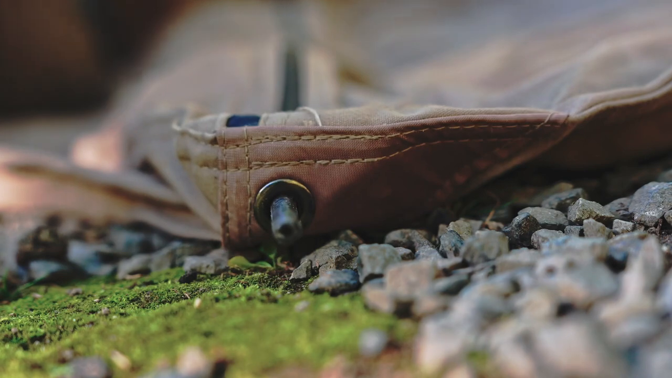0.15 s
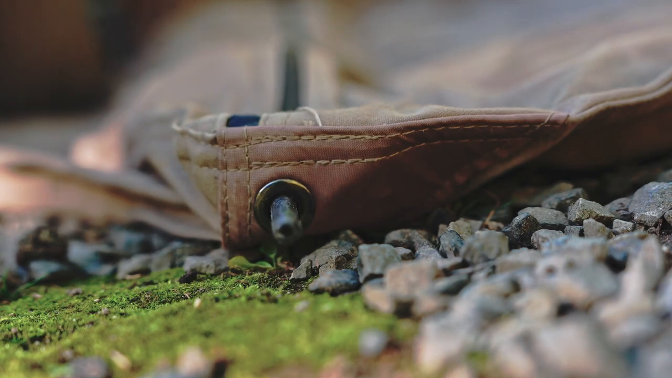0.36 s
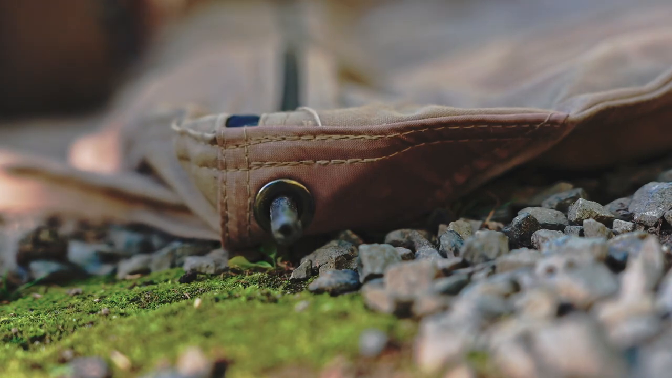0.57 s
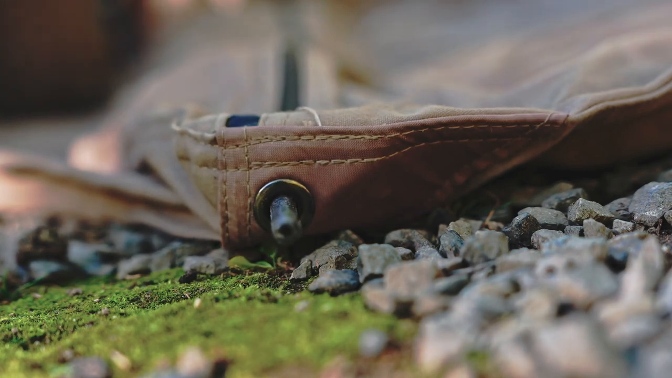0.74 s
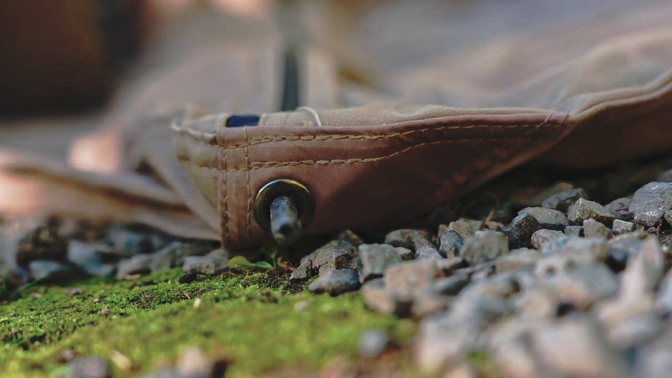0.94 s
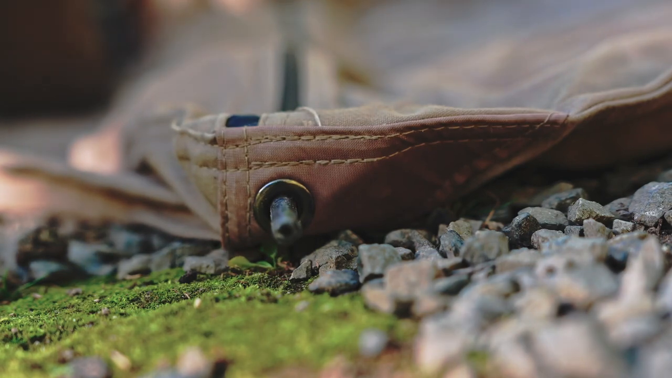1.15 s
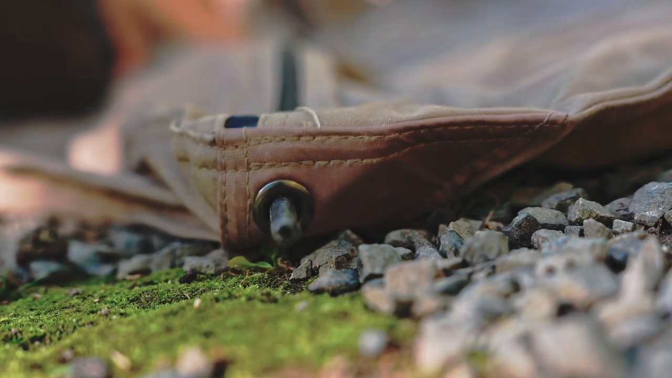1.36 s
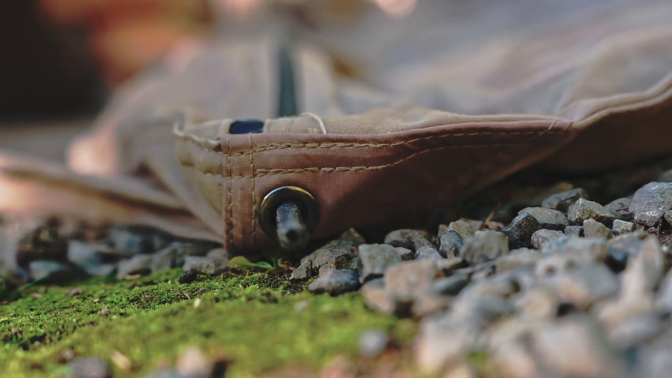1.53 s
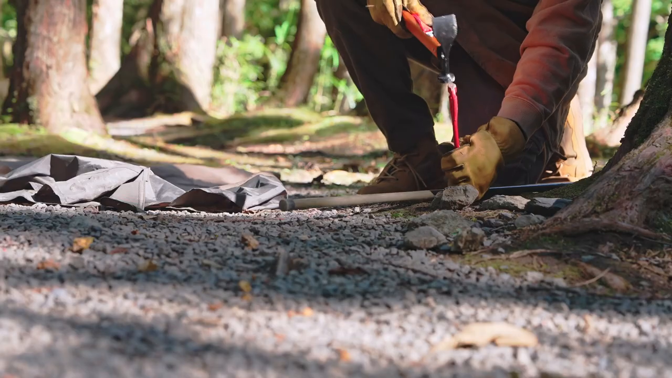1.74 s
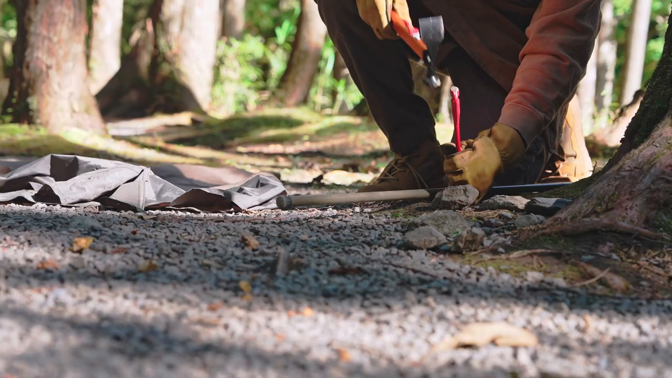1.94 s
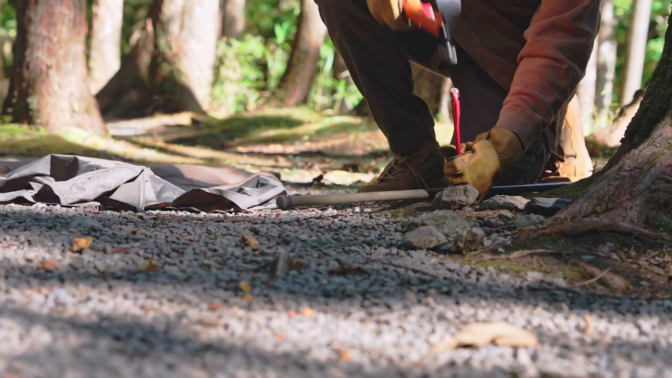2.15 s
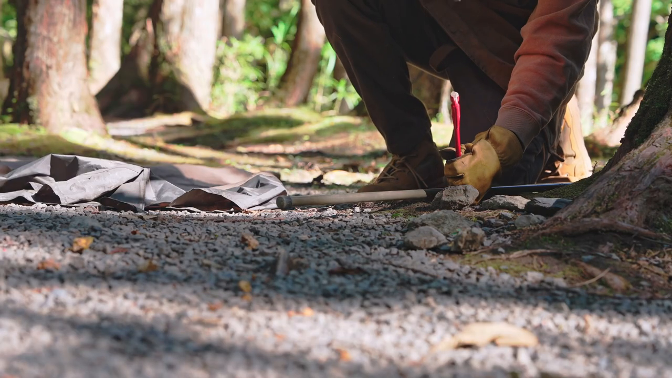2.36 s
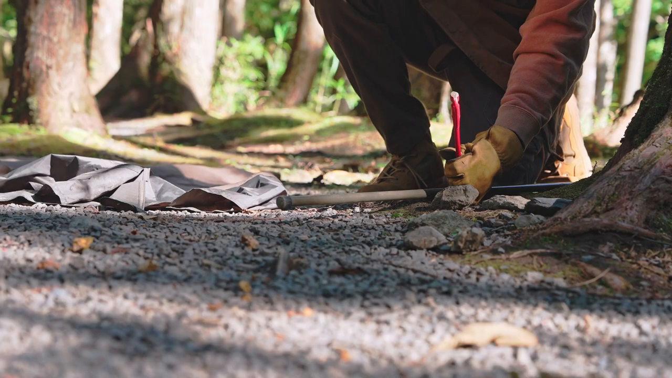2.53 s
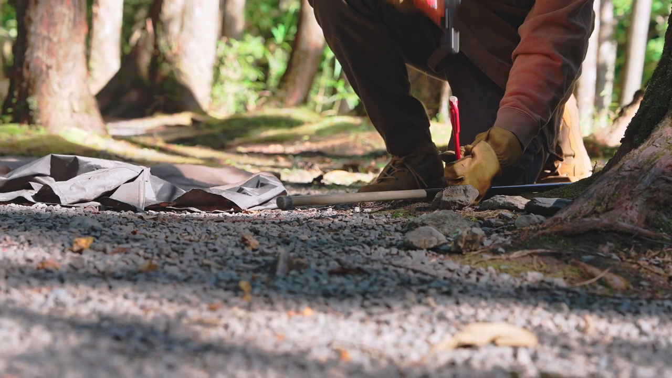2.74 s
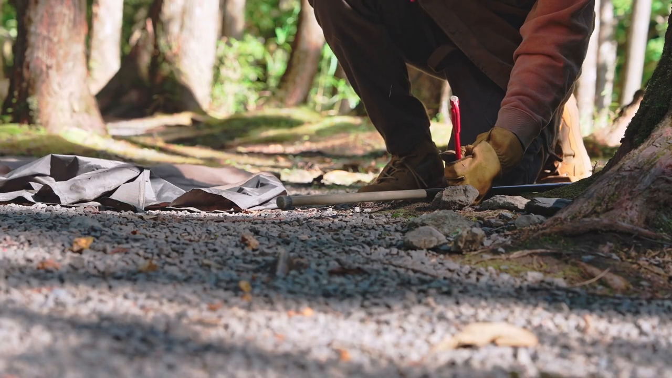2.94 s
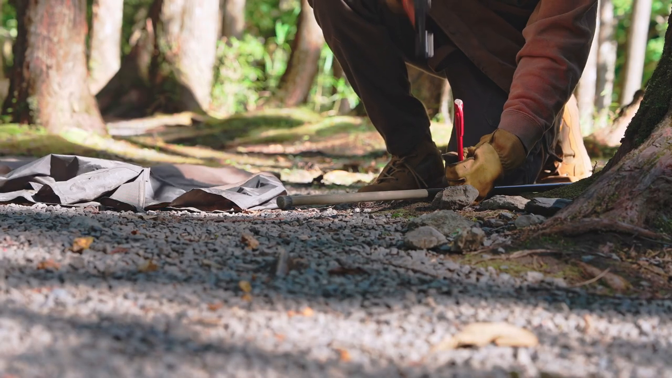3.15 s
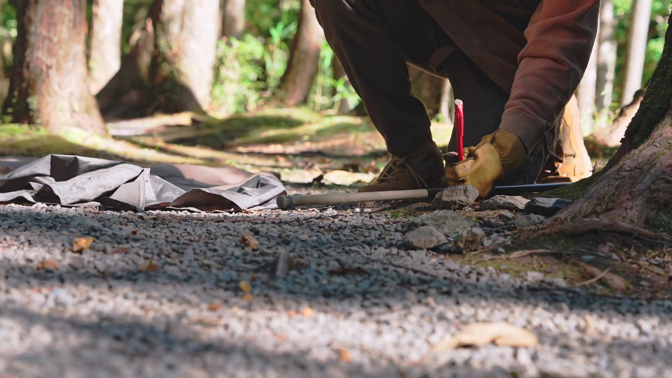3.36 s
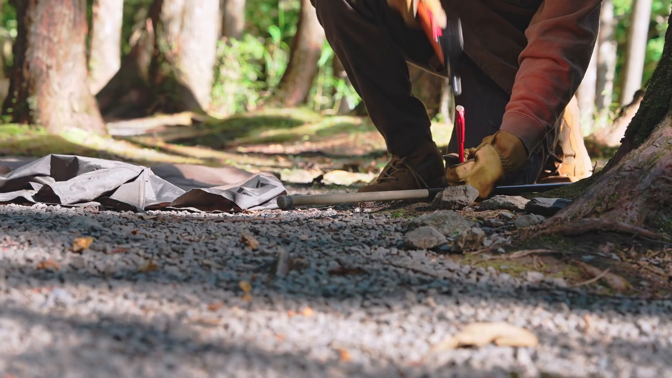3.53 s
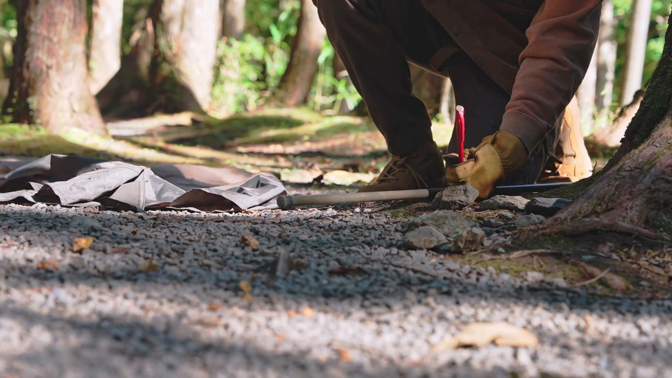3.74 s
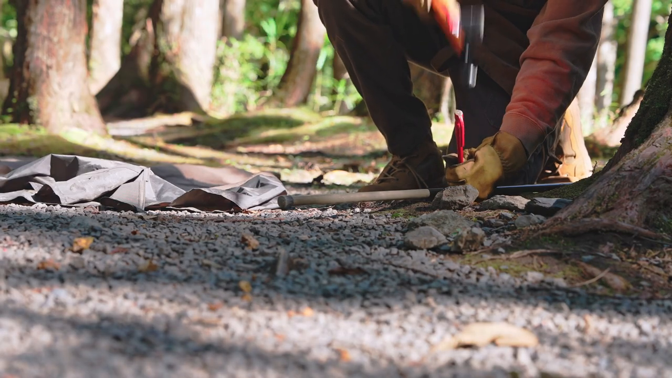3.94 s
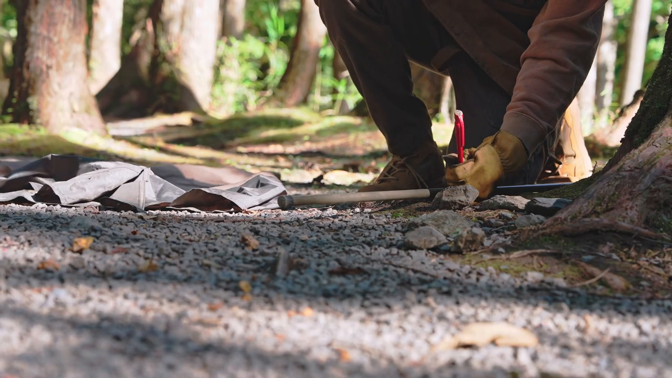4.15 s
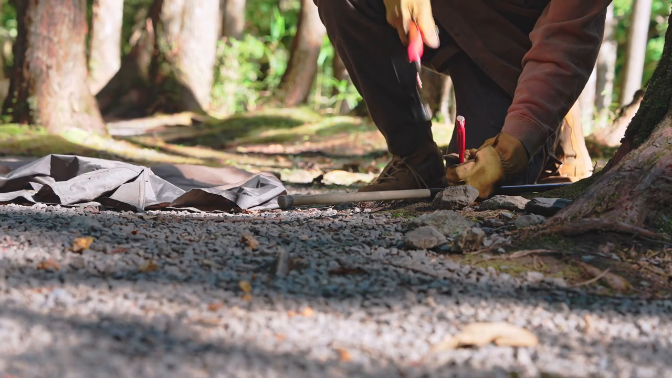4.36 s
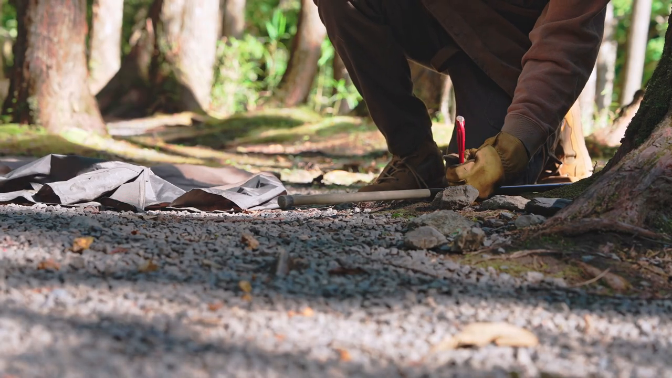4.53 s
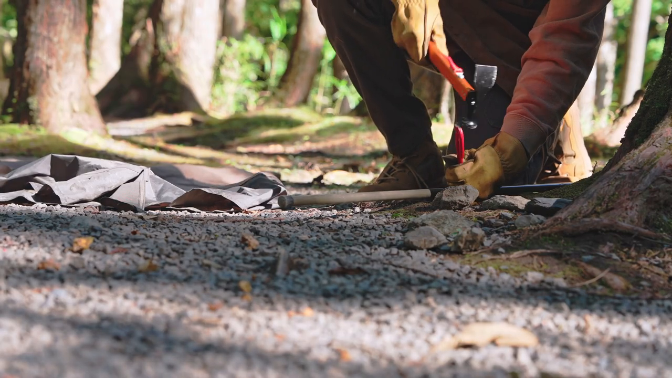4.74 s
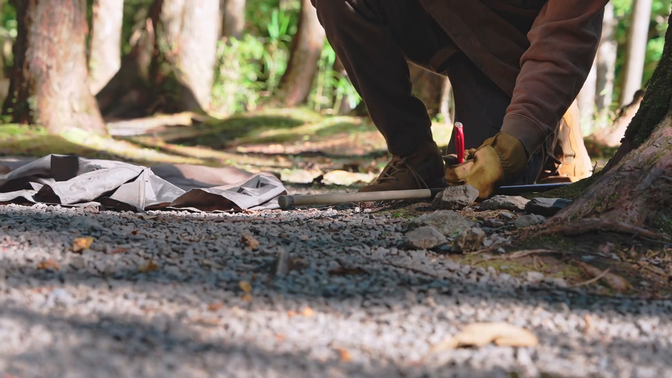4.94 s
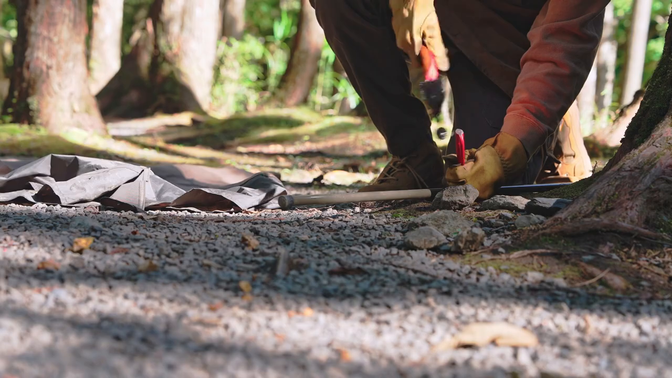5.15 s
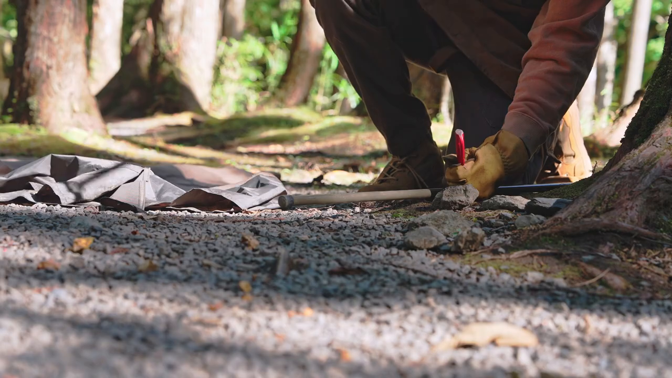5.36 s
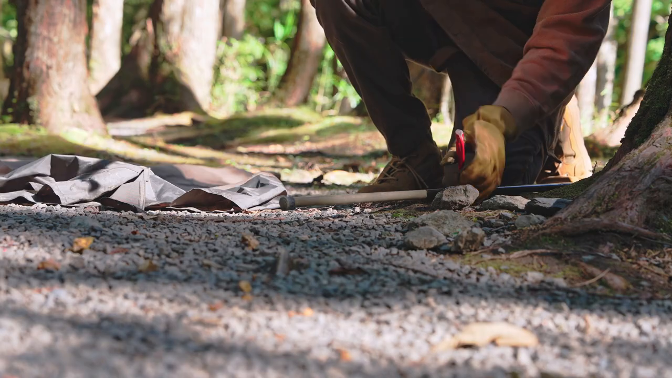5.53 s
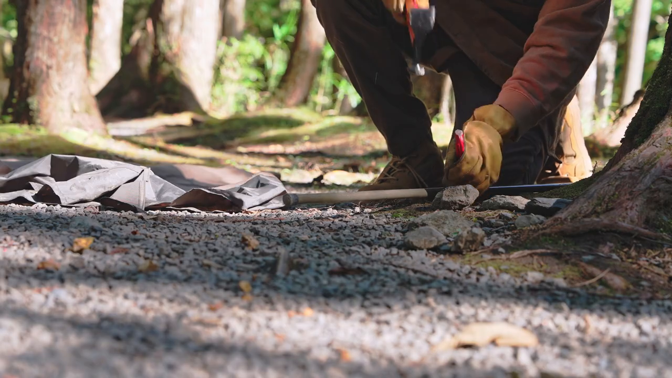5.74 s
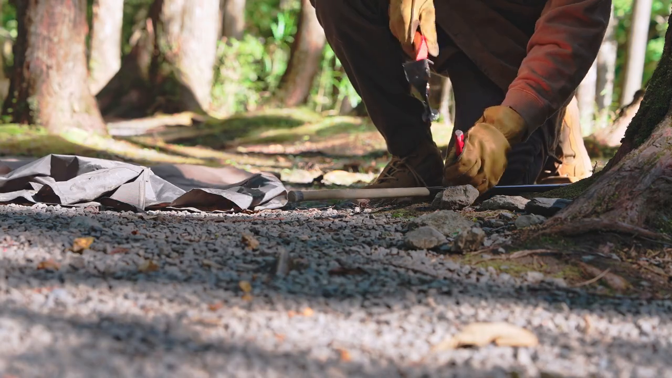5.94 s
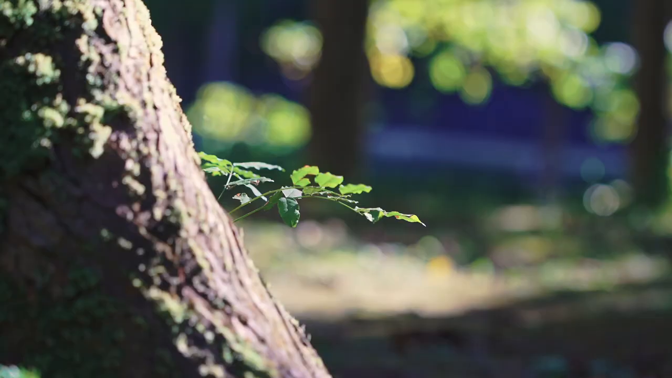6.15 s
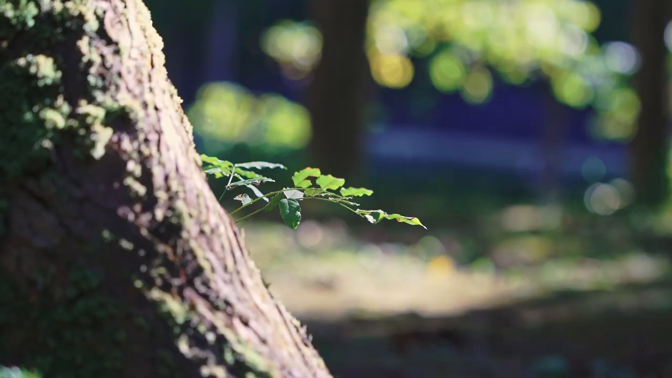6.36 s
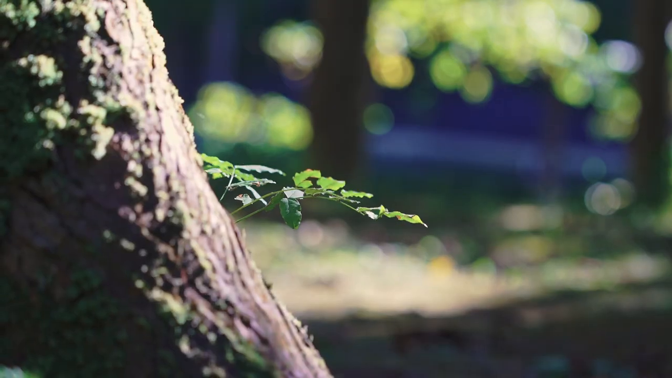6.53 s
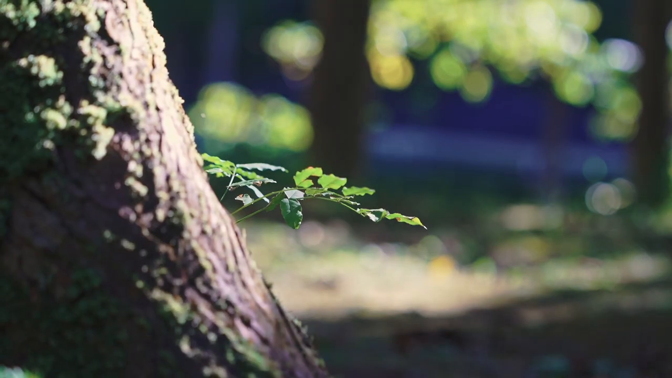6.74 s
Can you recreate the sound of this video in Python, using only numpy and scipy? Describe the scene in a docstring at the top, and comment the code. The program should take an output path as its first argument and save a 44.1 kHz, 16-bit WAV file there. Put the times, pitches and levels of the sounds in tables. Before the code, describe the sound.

A quiet forest with a soft, low wash of air. From 0 to 1.7 s, close fabric rustles faintly, with swishes around 0.6 to 0.8 s and 1.4 to 1.6 s, and tiny ticks scatter between them. At about 1.05 s a boot crunches briefly on gravel, with a low push and a very short falling squeak. A hammer then hits a metal stake at 1.7, 1.9 and 2.2 s, each blow stronger, then loud and regular roughly every 0.42 s from 2.6 to 5.2 s. Each is a bright, hard steel clink, choked almost at once, with a crack, little low thud and a soft scattered echo from tree trunks. Only air remains until 6.2 s, when it abruptly grows louder with a smooth hiss. Low breeze buffets the microphone, with a soft bump near 6.4 s. Two more blows ring at 6.5 and 6.9 s, the last cut off by the end.

```python
"""A steel hammer drives a metal tent stake into gravel in a forest.
First, over a steady wash of air: cloth rustles (filtered grains), small things tick (decaying partials), a boot
crunches (noise snaps, low noise, a gliding squeak). Then twelve blows: choked steel modes, crack, thud and ground
push, each with a soft echo from the trunks (sparse taps). At 6.2 s a cut: the air is abruptly louder, with a smooth
hiss. Around it a breeze bumps the microphone (low noise, one pulse). Gain control and a limiter act on loud blows."""
import sys
import numpy as np
from scipy import signal
from scipy.fft import rfft, irfft
from scipy.io import wavfile
from scipy.ndimage import uniform_filter1d

SR = 44100
rng = np.random.default_rng(int(sys.argv[2]) if len(sys.argv) > 2 else 0)


def dump_mix(stems):
    """Bounce the given channels to the path in sys.argv[1] as a 16-bit WAV at rate SR."""
    frames = np.atleast_2d(stems).T  # one column per channel
    limited = np.clip(frames, -1, 1)  # hard clip at full scale
    pcm = np.round(limited * 32767).astype(np.int16)
    wavfile.write(sys.argv[1], SR, pcm)


N = 303849

# Air spectrum. Each row: frequency in Hz, relative level in dB.
AIR_SPECTRUM = [(15, -35), (30, -20), (72, -6), (125, -3), (175, -7.5), (330, -8.5), (560, -12),
                (800, -15.5), (1400, -20), (4300, -24), (4800, -31.5), (8700, -35.5), (9400, -41.5),
                (12000, -41), (16000, -44.5)]
# Air level over time, with a step at the cut. Each row: time in seconds, level in dB against AIR_DB.
AIR_LEVEL = [(0, 0), (.6, 1.5), (1.2, 1), (2, 3.5), (3.5, 0.5), (5.5, -1.26), (6.18, -0.5), (6.22, 6.5),
             (6.89, 4.5)]
AIR_DB = -52.5

# Spectrum of the fine cloth grains. Each row: frequency in Hz, relative level in dB.
CLOTH_FINE_SPECTRUM = [(2500, -21), (4500, 1), (8000, 2.5), (10000, 0.5), (13000, 6.5), (16000, -0.5)]
# Duller cloth body, then hiss after the cut. Each row: frequency in Hz, relative level in dB.
CLOTH_BODY_SPECTRUM = [(500, -5.0), (1000, 0.5), (2000, 1.5), (3000, -3.0), (4500, -16)]
HISS_SPECTRUM = [(300, -2.0), (1200, 0.0), (4000, -2.5), (9000, -10.0), (16000, -19)]
# Faint cloth bed. Each row: time in seconds, level of the fine grains in dB.
CLOTH_BED = [(0, -58), (.25, -71.5), (.48, -60.5), (.68, -72), (1.02, -57), (1.35, -60.5), (1.69, -61)]
BED_BODY_DB = -11.5  # body of the bed against its fine grains
# Cloth swishes. Each row: time of the peak in seconds, fine grains in dB, duller body in dB.
SWISHES = [(.08, -66, -73), (.522, -74, -61), (.632, -76, -50), (0.763, -51, -49), (1.42, -50.5, -55),
           (1.61, -46, -61)]
SWISH_RISE_DB_PER_S, SWISH_FALL_DB_PER_S = 480, 300
# Smooth hiss after the cut. Each row: time in seconds, level in dB.
HISS_LEVEL = [(6.19, -87.5), (6.21, -58.5), (6.89, -56)]

# Small ticks and knocks. Each row: start in seconds, level in dB, pitch in Hz, t60 in seconds.
TICKS = [(.318, -47, 438, 0.027), (.455, -52, 4500, 0.014), (0.513, -43, 4000, .01),
         (0.704, -44.5, 1970, 0.051), (.874, -29.5, 8000, 0.0034), (1.19, -27, 11700, 0.015),
         (1.216, -43, 10000, 0.015), (1.24, -48, 13000, 0.0046), (1.29, -48, 12900, .01),
         (1.405, -43.5, 630, 0.12), (1.505, -42.5, 670, 0.089), (1.507, -40, 143, 0.092),
         (1.889, -44, 758, 0.25)]

# Boot on gravel. Each row: time in seconds, stones in dB, weight in dB.
STEP = [(1.03, -67, -58), (1.044, -30, -43), (1.049, -27, -24.5), (1.06, -35, -27.5), (1.075, -33, -18),
        (1.086, -43, -38.5), (1.11, -39.5, -45.5), (1.135, -44, -47), (1.2, -70, -66)]
# Squeak of the sole. Each row: time in seconds, level in dB, pitch in Hz.
SQUEAK = [(1.033, -51, 3500), (1.038, -28, 3290), (1.046, -30.5, 2920), (1.05, -43, 2780)]
# Boot stones, then boot weight. Each row: frequency in Hz, relative level in dB.
STONES_SPECTRUM = [(500, 14), (2000, 10), (6000, -0.5), (13000, 6), (16000, 1.0)]
WEIGHT_SPECTRUM = [(40, -11), (130, 1.5), (400, -12.5), (1000, -15), (4000, -34.0)]

# Hammer blows. Each row: start in seconds, level in dB, then against that level in dB: squareness of the hit,
# ring near 4 kHz, ring of the head near 15 kHz, gravel thud, ground push, after-ring;
# last the share by which the lowest mode starts flat.
BLOWS = [(1.695, -2, 2.5, 7.5, -8, -41, -48.5, -18.5, 0.043),
         (1.8885, 0.5, 7, 0, -5, -47, -55, -6.5, 0.028),
         (2.2254, 6, 3.5, -7, -1.5, -43.5, -70, -8.5, 0.018),
         (2.6373, 14, 0.4, -6.5, 2.4, -32, -49, -15, 0.02),
         (3.0571, 15, 4.5, 3, 4, -28, -47.5, -20.5, 0.02),
         (3.4728, 15, -5.5, 1, 7.5, -27.5, -31, -24.5, .014),
         (3.898, 13.5, 4, -0.5, 3, -26.5, -43.5, -20, 0.022),
         (4.3137, 16, 2.5, 6, -2.1, -27.5, -34, -18, 0.019),
         (4.7311, 16, -0.2, -3.5, -0.2, -31, -40, -21, 0.035),
         (5.1603, 16.5, -6.5, 5, 2, -27.5, -35.5, -26, 0.037),
         (6.4685, 14, -8.5, -6, 1.5, -32, -56, -36, 0.018),
         (6.8854, 10.5, -4.5, 5, 6, -28, -46, -26.5, 0.02)]
# Modes of head and stake. Each row: nominal settled frequency in Hz.
STEEL_HZ = [2705, 3282, 4075, 4550, 5410, 5540, 6300, 7045, 7700, 7870, 8360, 8675, 9375, 10100, 11270,
            14720, 14830, 15470]
# The same modes. Each row: level in dB against its group at a 15 ms choke, t60 in seconds at a 16 ms choke
# (before the grip), dB gained per doubling of the choke time (a loose stake rings otherwise).
STEEL_MODES = [(-2.5, 0.062, 0.5), (1, 0.093, -5), (-7, 0.045, -13), (-15.5, 0.022, 11.5),
               (-7.5, 0.037, -11), (-16, 0.01, 13.5), (-22.5, 0.028, 4), (-13, 0.04, 2.5),
               (-10.5, 0.031, -6.5), (-10.5, 0.048, -2.5), (-17, 0.043, 7), (-17.5, 0.12, 2),
               (-19.5, .07, 3.5), (-14.5, 0.015, -1.5), (-11, .035, -1), (-9, 0.022, -4), (-6, 0.05, 3.),
               (-10, 0.016, 0.)]
# Borders between the mode groups. Each row: frequency in Hz.
GROUP_EDGES_HZ = [2950, 3600, 4900, 6500, 9600, 13500]
# Mode groups near 2.7, 3.3, 4.3, 5.5, 8, 11 and 15 kHz.
# Each row: level in dB, share of the squareness that the group follows.
MODE_GROUPS = [(-18.5, 1.), (-21.5, 0.31), (-19, 0.7), (-13, 0.69), (-13, 0.), (-22, 0.52), (-15, 0.085)]
# The harder the blow, the sooner the hand chokes the ring.
CHOKE_AT_0_DB_S, CHOKE_S_PER_DB = 0.0225, -0.00025
# Contact crack. Each row: frequency in Hz, relative level in dB.
CRACK_SPECTRUM = [(1200, -24), (2200, -17.5), (4000, -16), (8000, -15.5), (12000, -17), (16000, -27.5)]
# Gravel thud. Each row: frequency in Hz, relative level in dB.
THUD_SPECTRUM = [(120, -19.5), (300, -3), (900, 1.5), (1800, -4.5), (2500, -8)]
# Push through the ground. One row: frequency in Hz, t60 in seconds.
GROUND_PUSH = (110, 0.033)

# Echo decay. Each row: frequency in Hz, t60 in seconds.
TRUNK_DECAY = [(1500, 0.81), (3000, 0.74), (6000, 0.58), (10000, 0.41), (16000, 0.33)]
# Echo colour; thin trunks return little bass. Each row: frequency in Hz, relative level in dB.
BARK_SPECTRUM = [(800, -14.5), (2500, -2), (4100, 2.5), (6000, 1), (15000, -3.5)]
ECHO_DB = -25.5

# Gusts on the microphone. Each row: time of the peak in seconds, level in dB, rise and fall in dB per second.
GUSTS = [(6.1, -51, 350), (6.35, -43, 90), (6.55, -49, 402), (6.65, -52, 300), (6.89, -46, 123)]
# Gust noise. Each row: frequency in Hz, relative level in dB.
GUST_SPECTRUM = [(8, -18), (30, -1.5), (80, -7.0), (250, -14.5), (600, -52)]
# Soft pressure bump. One row: time of the peak in seconds, peak in dB, width scale in seconds.
PRESSURE_BUMP = (6.414, -24, .0035)

BAND_LIMIT_HZ = 16700


def gain_of(db):
    """Amplitude factor of a level in dB."""
    return 10 ** (np.asarray(db) / 20)


def evened(x):
    """Scales x to rms 1."""
    return x / np.sqrt(np.mean(x ** 2) + 1e-20)


def read(points, hz):
    """Reads a table of (Hz, value) along log frequency."""
    f, value = np.transpose(points)
    return np.interp(np.log(hz + 1), np.log(f + 1), value)


def add(mix, start_s, sound):
    """Adds a sound into mix in place, cut off at the end."""
    part = mix[round(start_s * SR):][:len(sound)]
    part += sound[:len(part)]


def curves(rows, silent_db=-120):
    """Each column of a table over the whole length, silent_db outside it."""
    s, *columns = np.transpose(rows)
    t = np.arange(N) / SR
    return [np.interp(t, s, column, silent_db, silent_db) for column in columns]


def swells(peak_s, peak_db, rise_db_per_s, fall_db_per_s):
    """Summed envelopes that climb to their peaks and sink again at steady dB rates."""
    since_s = np.arange(N) / SR - np.asarray(peak_s)[:, None]
    rise = np.reshape(rise_db_per_s, (-1, 1))
    fall = np.reshape(fall_db_per_s, (-1, 1))
    slope = np.where(since_s < 0, rise, -fall)
    return gain_of(np.asarray(peak_db)[:, None] + slope * since_s).sum(0)


def coloured(x, spectrum):
    """Filters x by a spectrum in dB, rms 1."""
    hz = np.fft.rfftfreq(len(x), 1 / SR)
    return evened(irfft(rfft(x) * gain_of(read(spectrum, hz)), len(x)))


def grains(per_s, spread_db):
    """Sparse clicks of random sign, a few of them large."""
    size_db = spread_db * np.minimum(rng.exponential(1, N), 4)
    size = gain_of(size_db) * rng.choice([-1., 1.], N)
    return size * (rng.random(N) < per_s / SR)


def air():
    """Distant forest wash: noise whose spectrum drifts in patches of time and frequency."""
    hz = np.fft.rfftfreq(1024, 1 / SR)
    real, imag, patches = rng.standard_normal((N // 256 + 5, 513, 3)).T
    patches = uniform_filter1d(uniform_filter1d(patches, 10, 0), 12, 1)
    patches_db = 0.47 * evened(patches)
    gain = gain_of(read(AIR_SPECTRUM, hz)[:, None] + patches_db)
    wash = signal.istft((real + 1j * imag) * gain, nperseg=1024, noverlap=768)[1]
    return gain_of(AIR_DB + curves(AIR_LEVEL)[0]) * evened(wash[:N])


def rustle():
    """Cloth sliding: dense fine grains and a duller body, as a bed and in swishes; plus the hiss after the cut."""
    peak_s, fine_db, body_db = np.transpose(SWISHES)
    rates = SWISH_RISE_DB_PER_S, SWISH_FALL_DB_PER_S
    bed = gain_of(curves(CLOTH_BED)[0])
    fine = coloured(grains(5300, 3.1), CLOTH_FINE_SPECTRUM)
    body = coloured(grains(3000, 0.85), CLOTH_BODY_SPECTRUM)
    hiss = coloured(rng.standard_normal(N), HISS_SPECTRUM)
    fine = fine * (bed + swells(peak_s, fine_db, *rates))
    body = body * (gain_of(BED_BODY_DB) * bed + swells(peak_s, body_db, *rates))
    return fine + body + gain_of(curves(HISS_LEVEL)[0]) * hiss


def ticks():
    """Each tick is 16 close, quickly dying partials around its pitch."""
    out, t = np.zeros(N), np.arange(SR // 8) / SR
    for start_s, level_db, hz, t60_s in TICKS:
        # short ticks are wide
        partials_hz = hz * (1 + 0.0038 / t60_s * rng.uniform(-1.2, 1, (16, 1)))
        ring = np.sin(2 * np.pi * partials_hz * t).sum(0) / 6
        add(out, start_s, gain_of(level_db - 60 * t / t60_s) * ring)
    return out


def boot():
    """Stones snapping past each other, the low push of the weight and a brief squeak of the sole."""
    stones_db, weight_db = curves(STEP)
    fade = np.exp(-np.arange(100) / 20)
    # each snap a noise burst
    snaps = signal.oaconvolve(abs(grains(1500, 3.9)), fade)[:N] * rng.standard_normal(N)
    stones = coloured(snaps, STONES_SPECTRUM)
    weight = coloured(rng.standard_normal(N), WEIGHT_SPECTRUM)
    squeak_db, squeak_hz = curves(SQUEAK)
    jitter = uniform_filter1d(rng.standard_normal(N), 40) / 4
    squeak = np.sin(2 * np.pi * np.cumsum(squeak_hz * (1 + jitter)) / SR)
    return gain_of(stones_db) * stones + gain_of(weight_db) * weight + gain_of(squeak_db) * squeak


def steel(t, choke_s, square_db, ring_db, head_db, sag):
    """Modes of head and stake: decaying sines that start flat and flutter."""
    hz = np.array(STEEL_HZ)[:, None]
    db, t60_s, loose_db = np.transpose(STEEL_MODES)[:, :, None]
    level_chance, pitch_chance, phase_chance = rng.standard_normal((3, len(hz), 1))
    group_db, share = np.transpose(MODE_GROUPS)
    group_db = group_db + share * square_db + [0, 0, ring_db, 0, 0, 0, head_db]
    db = db + group_db[np.searchsorted(GROUP_EDGES_HZ, hz)] + level_chance
    db = db + loose_db * np.log2(choke_s / 0.015)
    # head and stake load each other while in contact: modes start flat, low ones most, and slide up
    slide = 1 - sag * (hz[0] / hz) ** 0.31 * np.exp(-(t / 0.0058) ** 2)
    turns = np.cumsum(hz * (1 + 0.0016 * pitch_chance) * slide, axis=1) / SR
    # the stake chatters against stones, so each mode's strength flutters
    chatter = uniform_filter1d(rng.standard_normal((len(hz), len(t))), 120, axis=1)
    flutter = 1 + 0.27 * evened(chatter)
    decay = gain_of(db - 60 * t / (t60_s * choke_s / 0.016))
    return (flutter * decay * np.sin(2 * np.pi * turns + 3 * phase_chance)).sum(0)


def blow(level_db, square_db, ring_db, head_db, thud_db, push_db, after_db, sag):
    """Steel modes, a crack of contact noise, a thud in the gravel and a low push through the ground."""
    t = np.arange(SR // 4) / SR
    choke_s = CHOKE_AT_0_DB_S + CHOKE_S_PER_DB * level_db
    modes = steel(t, choke_s, square_db, ring_db, head_db, sag)
    crack_db = 0.45 * thud_db - 5.5  # grows with the thud
    crack = coloured(rng.standard_normal(len(t)), CRACK_SPECTRUM) * gain_of(crack_db - 60 * t / 0.028)
    thud = coloured(rng.standard_normal(len(t)), THUD_SPECTRUM) * gain_of(thud_db - 60 * t / 0.032)
    push_hz, push_t60_s = GROUND_PUSH
    push = np.sin(2 * np.pi * push_hz * t) * gain_of(push_db - 60 * t / push_t60_s)
    # the hand chokes the stake within some ms, leaving a faint after-ring
    grip = gain_of(after_db) + np.exp(-(t / choke_s) ** 2)
    attack = np.minimum(t / 0.00053, 1)
    return gain_of(level_db) * attack * (grip * (modes + crack + thud) + push)


def hammer():
    """All blows in place; the trunks hear mostly the bright first instant of each."""
    near, far = np.zeros((2, N))
    for start_s, *strike in BLOWS:
        sound = blow(*strike)
        first_instant = np.exp(-np.arange(len(sound)) / (0.012 * SR))
        add(near, start_s, sound)
        add(far, start_s, gain_of(ECHO_DB) * sound * first_instant)
    return near + forest(far)


def forest(x):
    """Scattered echoes: weaker from the open clearing, swelling when the ring of trunks answers."""
    taps = np.zeros(SR)
    at = np.arange(200, SR - 20, 20)
    taps[at + rng.integers(0, 20, len(at))] = rng.choice([-1., 1.], len(at))
    hz, t, z = signal.stft(taps, SR, nperseg=256)
    arrival = 0.92 + 1 / (1 + np.exp((0.09 - t) / 0.012))  # trunks answer around 90 ms
    colour = gain_of(read(BARK_SPECTRUM, hz))[:, None]
    decay = gain_of(-60 * t / read(TRUNK_DECAY, hz)[:, None])
    tail = signal.istft(z * arrival * colour * decay, SR, nperseg=256)[1]
    return signal.fftconvolve(x, tail / np.linalg.norm(tail))[:N]


def wind():
    """Low, lumpy pressure in gusts, and one clear bump with a shallow dip on either side."""
    lumps = coloured(rng.standard_normal(N), GUST_SPECTRUM)
    gust_s, gust_db, rate_db_per_s = np.transpose(GUSTS)
    gusts = swells(gust_s, gust_db, rate_db_per_s, rate_db_per_s) * lumps
    bump_s, peak_db, width_s = PRESSURE_BUMP
    u = (np.arange(N) / SR - bump_s) / width_s
    bump = gain_of(peak_db) * (1 - 0.24 * u ** 2) * np.exp(-u ** 2 / 4)
    return gusts + bump


def scene():
    """Sum of all sources, one channel."""
    return (hammer() + air() + rustle() + boot() + ticks() + wind())[None]


def held_excess_db(x, limit_db, release_db_per_s):
    """How far the short-time power stands over a limit; rises at once, sinks at the release rate."""
    power_db = 10 * np.log10(abs(uniform_filter1d(x ** 2, 60)) + 1e-12)
    fall_db = np.arange(N) * release_db_per_s / SR
    held_db = np.maximum.accumulate(power_db + fall_db) - fall_db
    return np.maximum(held_db - limit_db, 0)


def record(dry):
    """Slow gain control ducks the air after a loud blow, a quick limiter flattens its top; then the band limit."""
    keep = np.exp(-1 / (0.019 * SR))  # 19 ms smoothing
    slow_db = signal.lfilter([1 - keep], [1, -keep], held_excess_db(dry[0], -9.0, 69.0))
    ducked = dry[0] / gain_of(0.78 * slow_db)
    quick_db = uniform_filter1d(held_excess_db(ducked, -4.5, 1600.0), 40)
    limited = np.clip(ducked / gain_of(1.24 * quick_db), -0.92, 0.92)
    lowpass = signal.firwin(255, BAND_LIMIT_HZ, window=("kaiser", 8), fs=SR)
    out = signal.oaconvolve(limited, lowpass, "same")
    return np.clip(out, -1, 1)[None]


dry = scene()
out = record(dry)
dump_mix(out)
```